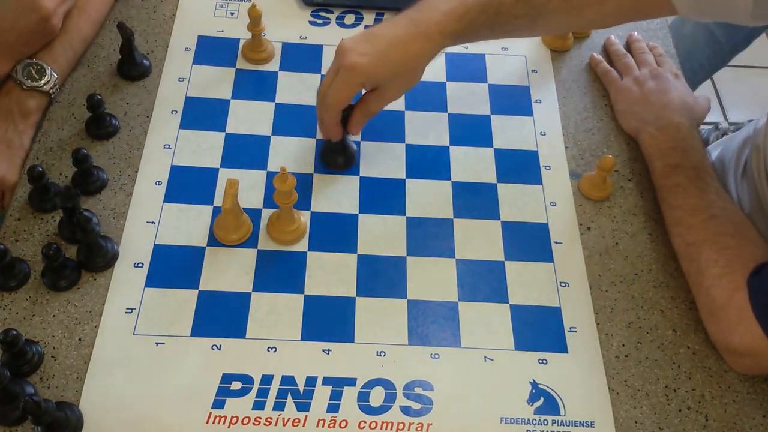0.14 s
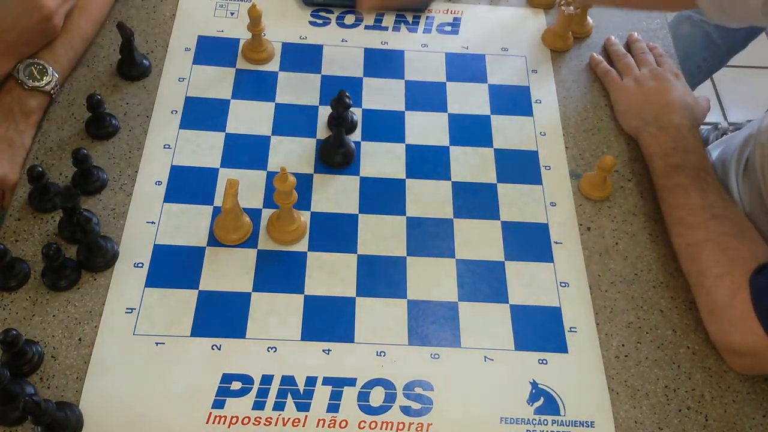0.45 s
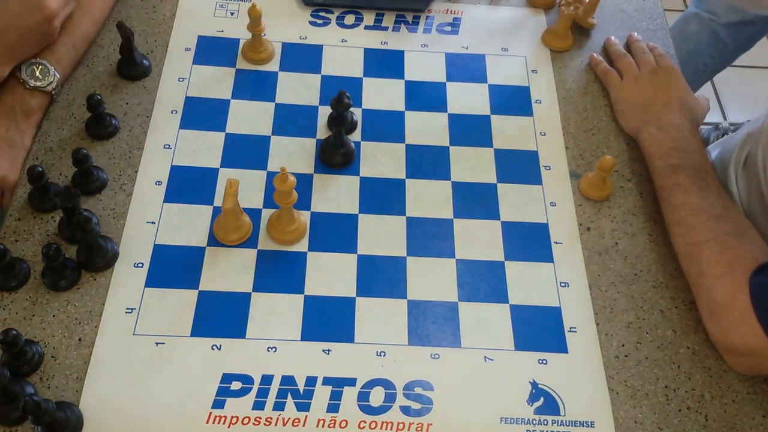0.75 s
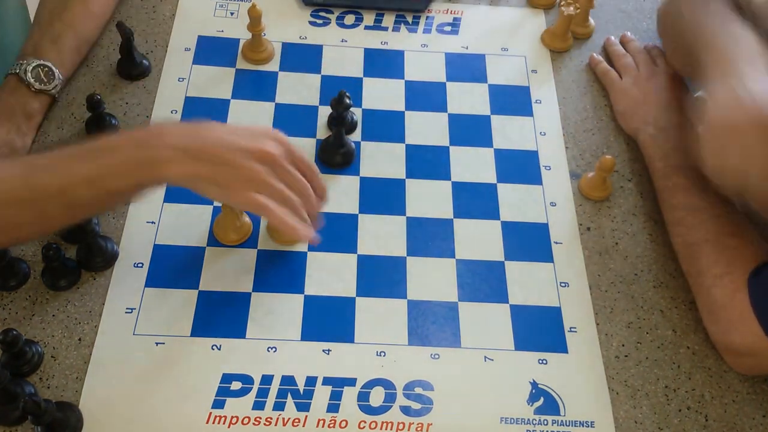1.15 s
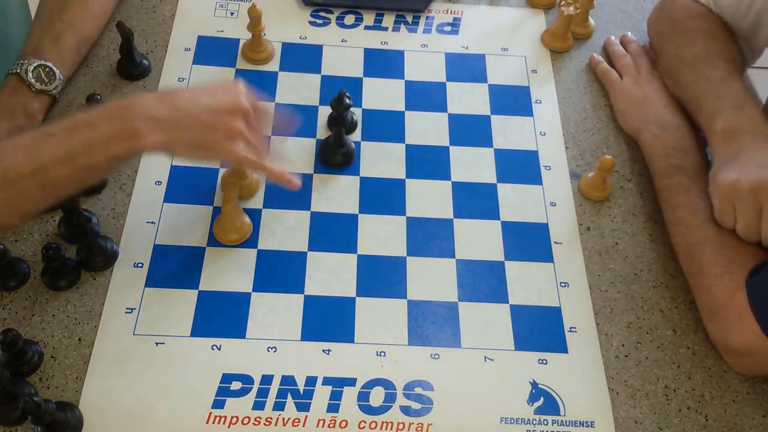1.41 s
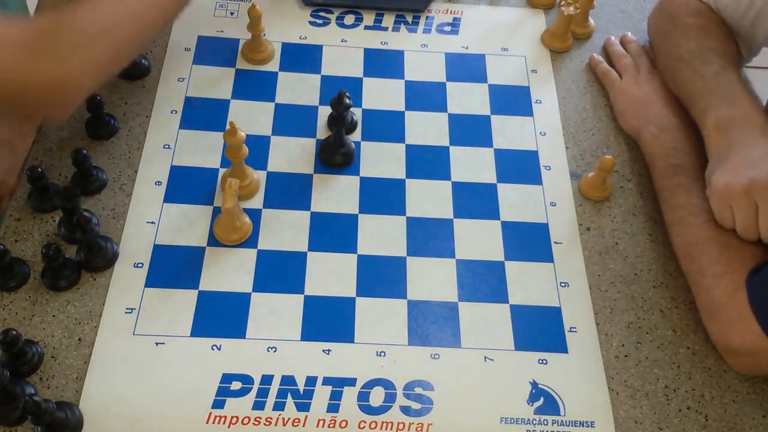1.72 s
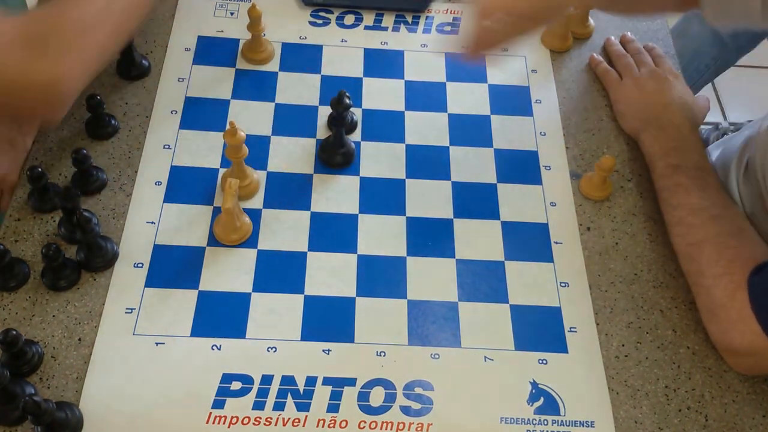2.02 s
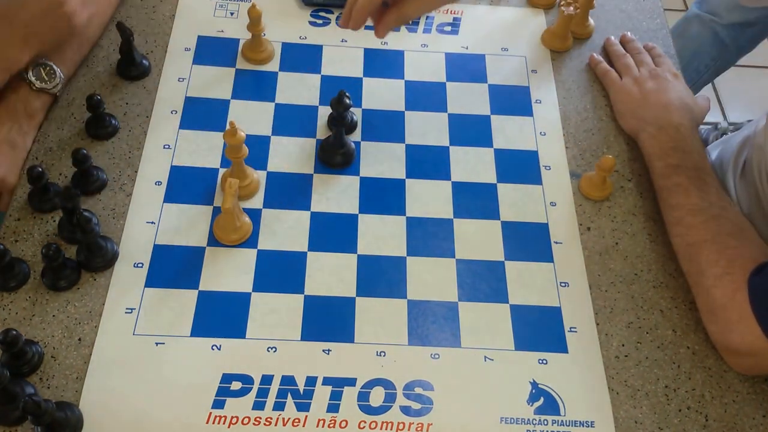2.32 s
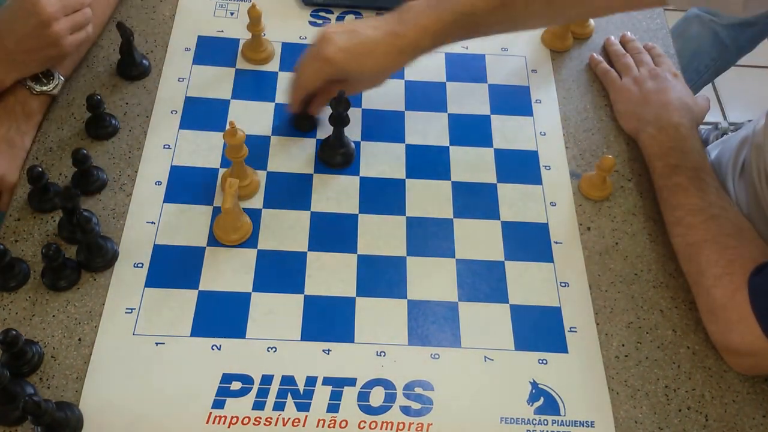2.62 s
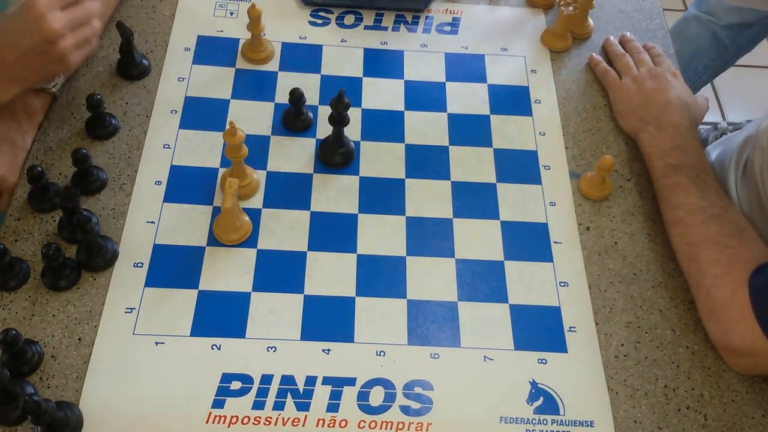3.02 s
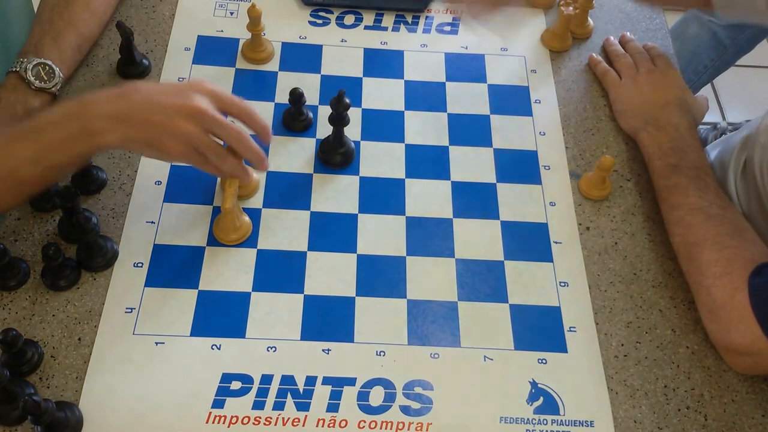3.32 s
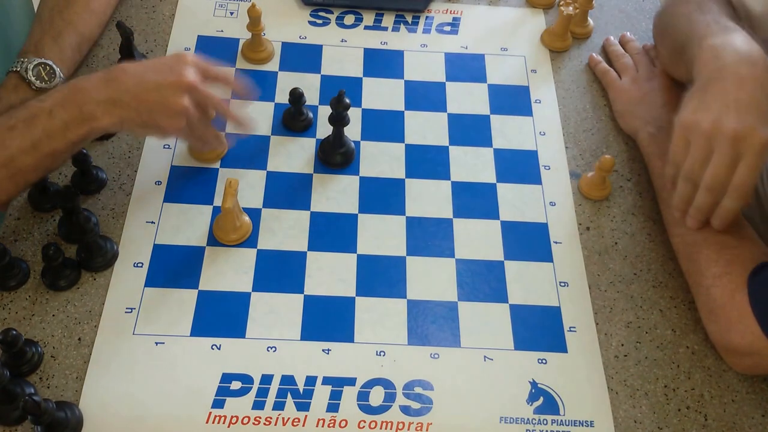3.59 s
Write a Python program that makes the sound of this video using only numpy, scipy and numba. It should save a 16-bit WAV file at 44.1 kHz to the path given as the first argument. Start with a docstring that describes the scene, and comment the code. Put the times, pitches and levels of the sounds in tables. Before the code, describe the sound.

A chess clock's button is struck hard, then more softly, then hard again, just over a second apart. Each clack rattles briefly and leaves a roomy echo over constant motor hum and airy hiss; close, mono, slightly squashed peaks.

```python
"""A fan motor hums under a rush of air; then three hard knocks of a plastic chess clock ring in an echoing room.
Hum: wavering sines on multiples of the shaft rate, plus fainter drones. Air: coloured noise.
Knock: decaying noise crack with three rebounds, plus decaying sines for the case modes.
Echo: noise in bands that decay separately. The background dips after the first knock.
Mono in both channels; a look-ahead limiter ducks everything around the hardest knocks."""
import sys
import numpy as np
from scipy import signal
from scipy.fft import rfft, irfft, next_fast_len
from scipy.io import wavfile
from scipy.ndimage import uniform_filter1d, minimum_filter1d
from numba import njit

SR = 44100
rng = np.random.default_rng(int(sys.argv[2]) if len(sys.argv) > 2 else 0)


def master_out(mix):
    """Clip the mix to full scale and print it as 16-bit PCM to the path in sys.argv[1]."""
    frames = np.transpose(np.atleast_2d(mix))
    ceiling = np.clip(frames, -1, 1)
    pcm = np.round(ceiling * 32767).astype(np.int16)
    wavfile.write(sys.argv[1], SR, pcm)


N = 165375

# Fan hum lines, before wavering: shaft_multiple, level_db (rms)
FAN_LINES = [(1, -47), (2, -24.5), (3, -41), (4, -46), (6, -58.5), (7, -37.5)]
# Fainter steady tones of other machines, before wavering: pitch_hz, level_db (rms)
DRONES = [(82, -46.5), (99.5, -45), (124, -44.5), (372, -60), (721, -52.5), (1264, -52), (1620, -57),
          (1794, -52)]
# Slow swell of the strongest hum line: time_s, gain_db
HUM_SWELL = [(0, -3), (.2, -2.5), (.55, 0.5), (1.03, 1), (1.3, -1), (1.6, -0.5), (2.1, 2), (2.45, -1.5),
             (2.68, -2.5), (3.05, 2), (3.45, 0), (3.75, -2.5)]
# Spectrum of the air rush, relative: freq_hz, density_db (per Hz)
AIR_SPECTRUM = [(20, -29), (45, -17), (70, -1), (140, 3.5), (220, -0.5), (310, 0), (400, -3), (540, -3.5),
                (750, -6), (1300, -10.5), (2200, -13.5), (3500, -14.5), (4900, -22), (6200, -31.5),
                (8000, -32.5), (10000, -29), (10900, -39.5), (11700, -69), (16000, -74)]
# Gain of the whole background, dipping after the first knock: time_s, gain_db
BACKGROUND_GAIN = [(0, 0), (1.05, 0), (1.09, -3.5), (1.4, -3.5), (1.75, -0.5), (3.1, -0.5), (3.75, 0)]
# Room decay by frequency: freq_hz, t60_s
ROOM_T60 = [(200, 1.55), (800, 1.04), (3000, 0.94), (5500, 0.7355), (10000, 0.56), (14000, 0.05)]
# Colour of the room's echo: freq_hz, gain_db
ROOM_COLOUR = [(100, -12.5), (270, 1), (400, -3), (540, 2.5), (750, -2.5), (1000, -0.5), (1300, -6),
               (1600, 1.5), (2000, -4.5), (2500, 1.5), (3100, 4.5), (4000, 0.8), (5500, -6), (7800, -7.5),
               (9400, 1.5), (10700, -0.5), (11500, -13.5), (12200, -60), (16000, -70)]
# Spectrum of the plastic's crack, relative: freq_hz, density_db (per Hz)
CRACK_SPECTRUM = [(100, -25), (270, -7), (800, -9), (1300, -11), (1900, -2.5), (3000, 4), (4200, 1),
                  (5500, -8), (7500, -10), (9400, 3), (10800, -2), (12500, -30), (14500, -22), (16000, -47)]
# Modes of the case, relative levels: pitch_hz, t60_s, level_db
CASE_MODES = [(270, 0.056, -19), (470, .05, -25), (537, 0.065, -9.5), (604, 0.077, -14), (877, 0.092, -22),
              (1041, 0.13, -20.5), (1567, 0.061, -16), (1880, .04, -20), (2365, 0.033, -15),
              (2700, 0.062, -19), (3120, 0.017, -13.5), (3670, 0.028, -8.5), (4070, 0.041, -8.5),
              (9265, 0.033, -12)]
# Rebounds of the rocker after first contact, before spacing: delay_s, level_db
REBOUNDS = [(.0021, -3), (.0064, -7), (0.0112, -5.5)]
# Presses: start_s, level_db, treble_db, thump_db, rebound_spacing (factor), room_db
PRESSES = [(0.7184, 0, -1, 1.5, 1, -0.5), (1.8767, -6.5, -6, 0.5, 0.66, -2),
           (3.1940, 0.14, -1, 2.5, 0.95, 0)]

SHAFT_HZ, SHAFT_DRIFT_RATIO = 57.85, 0.00078  # drift: rms fraction of pitch
WAVER_DB = 1.23
AIR_DB, AIR_FLICKER_DB = -30.5, -0.36
TAIL_DB, ROOM_ONSET_S = -12, 0.013
EARLY_DB, EARLY_T60_S = -17, 0.05  # table top and players
CRACK_DB, CRACK_T60_S, CASE_DB = -4, 0.022, -4
RING_ROOM_DB = -29.5  # case modes lingering in the echo
THUMP_HZ, TREBLE_FROM_HZ, TREBLE_HZ = 600, 7100, 9000
LIMIT_DB, LOOKAHEAD_S, RELEASE_S = -1.7, 0.02, 0.026
TOP_HZ = 15100


def undb(db):
    """Decibels to amplitude gain."""
    return 10 ** (np.asarray(db) / 20)


def unit(x):
    """Scale to rms 1."""
    return x / np.sqrt(np.mean(x ** 2))


def at_hz(table, hz):
    """Interpolate a (freq_hz, value) table on a log-frequency axis."""
    freq_hz, value = np.array(table, float).T
    return np.interp(np.log(np.maximum(hz, 1)), np.log(freq_hz), value)


def curve(table):
    """Interpolate a (time_s, value) table at every sample."""
    time_s, value = np.array(table, float).T
    return np.interp(np.arange(N) / SR, time_s, value)


def colour(x, table):
    """Minimum-phase filter with a (freq_hz, gain_db) response, built by folding the cepstrum."""
    size = next_fast_len(2 * len(x), True) // 2 * 2
    gain = undb(at_hz(table, np.fft.rfftfreq(size, 1 / SR)))
    cepstrum = irfft(np.log(gain))
    cepstrum[1:size // 2] *= 2
    cepstrum[size // 2 + 1:] = 0
    response = np.exp(rfft(cepstrum))
    return irfft(rfft(x, size) * response)[:len(x)]


def fade(t, t60_s):
    """Exponential decay, 60 dB down at t60_s."""
    return np.exp(-np.log(1000) * t / t60_s)


def walk(rate_hz):
    """Smooth random wandering of rms 1: random steps, averaged twice."""
    hold = int(SR / rate_hz)
    steps = np.repeat(rng.standard_normal(N // hold + 1), hold)
    smooth = uniform_filter1d(uniform_filter1d(steps, hold), hold)
    return unit(smooth[:N])


def delayed(x, seconds):
    """Start x later, in a track of full length."""
    start = max(int(round(seconds * SR)), 0)
    return np.pad(x, (start, N))[:N]


def air():
    """Rush of moving air: coloured noise with a slight level flicker."""
    rush = unit(colour(rng.standard_normal(N), AIR_SPECTRUM))
    return rush * undb(AIR_DB + AIR_FLICKER_DB * walk(12.4))


def fan():
    """Motor hum on multiples of the shaft rate, plus drones; all share one pitch drift and waver in level."""
    drifting_s = np.cumsum(1 + SHAFT_DRIFT_RATIO * walk(3)) / SR
    lines = []
    for multiple, db in FAN_LINES:
        waver_db = curve(HUM_SWELL) if multiple == 2 else WAVER_DB * walk(5.45)
        lines.append((multiple * SHAFT_HZ, db + waver_db))
    for hz, db in DRONES:
        lines.append((hz, db + WAVER_DB * walk(4.96)))
    hum = np.zeros(N)
    for hz, db in lines:
        cycles = hz * drifting_s + rng.random()
        hum += np.sqrt(2) * undb(db) * np.sin(2 * np.pi * cycles)
    return hum


def room(size=32768):
    """Echo of one press: short early noise, then a diffuse tail whose treble dies first."""
    t, hz = np.arange(size) / SR, np.fft.rfftfreq(size, 1 / SR)
    noise = rfft(rng.standard_normal(size))
    centres_hz = np.geomspace(100, 16000, 16)
    tail = np.zeros(size)
    # Overlapping triangular bands that sum to 1
    for centre_hz, share in zip(centres_hz, np.eye(len(centres_hz))):
        band = irfft(noise * np.interp(hz, centres_hz, share))
        tail += band * fade(t, at_hz(ROOM_T60, centre_hz))
    early = undb(EARLY_DB) * rng.standard_normal(size) * fade(t, EARLY_T60_S)
    onset = 1 - np.exp(-(t / ROOM_ONSET_S) ** 2)
    return colour((undb(TAIL_DB) * tail + early) * onset, ROOM_COLOUR)


def contact(size=4096):
    """One blow of the rocker: a dense plastic crack and, separately, the ringing case modes."""
    t = np.arange(size) / SR
    crack = unit(colour(rng.standard_normal(size), CRACK_SPECTRUM)) * fade(t, CRACK_T60_S)
    ring = np.zeros(size)
    for k, (hz, t60_s, db) in enumerate(CASE_MODES):
        sign = (-1) ** k
        ring += sign * undb(db) * np.sin(2 * np.pi * hz * t) * fade(t, t60_s)
    return undb(CRACK_DB) * crack, undb(CASE_DB) * ring


def press(rebound_spacing, room_db):
    """The rocker hits its stop, rings the case and chatters to rest; the room answers."""
    crack, ring = contact()
    blow = delayed(crack + ring, 0)
    for delay_s, db in REBOUNDS:
        rebound_crack, _ = contact()
        blow = blow + undb(db) * delayed(rebound_crack, delay_s * rebound_spacing)
    echo = undb(room_db) * room()
    ringing_echo = signal.fftconvolve(echo, ring)[:len(echo)]
    return blow[:len(echo)] + echo + undb(RING_ROOM_DB) * ringing_echo


def clock():
    """All presses, each with its own level, treble and thump; the soft one is duller and settles sooner."""
    out = np.zeros(N)
    for start_s, db, treble_db, thump_db, rebound_spacing, room_db in PRESSES:
        tone = [(THUMP_HZ, thump_db), (2 * THUMP_HZ, 0), (TREBLE_FROM_HZ, 0), (TREBLE_HZ, treble_db)]
        knock = colour(press(rebound_spacing, room_db), tone)
        out += undb(db) * delayed(knock, start_s)
    return out


def scene():
    """Clock over fan and air, the same in both channels."""
    background = (fan() + air()) * undb(curve(BACKGROUND_GAIN))
    mono = background + clock()
    return np.array([mono, mono])


@njit
def recover(cut, keep):
    """Follow each rise at once, release exponentially."""
    out, held = np.empty(len(cut)), 0.
    for i in range(len(cut)):
        held = max(cut[i], held * keep)
        out[i] = held
    return out


def record(dry):
    """Look-ahead limiter turns down just before each peak; a steep low-pass cuts the top."""
    ahead = max(int(LOOKAHEAD_S * SR), 2)
    # Cuts are natural logs of gain
    over = np.log(np.maximum(np.abs(dry).max(axis=0) / undb(LIMIT_DB), 1))
    coming = -minimum_filter1d(-over, ahead, origin=-(ahead // 2))
    cut = recover(coming, np.exp(-1 / (RELEASE_S * SR)))
    cut = np.roll(uniform_filter1d(cut, ahead // 2), -(ahead // 4))
    lowpass = signal.ellip(8, .2, 80, TOP_HZ, fs=SR, output="sos")
    return signal.sosfilt(lowpass, dry * np.exp(-cut))


dry = scene()
out = record(dry)
master_out(out)
```